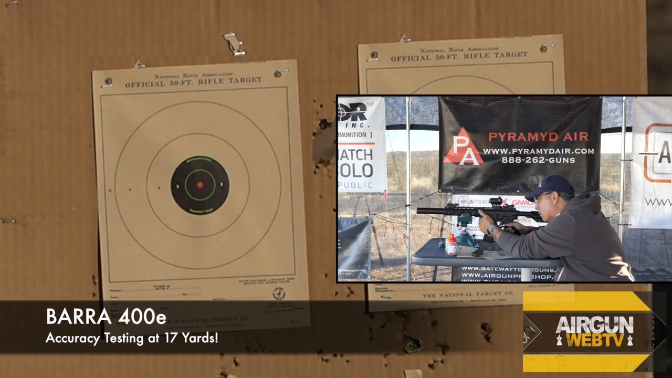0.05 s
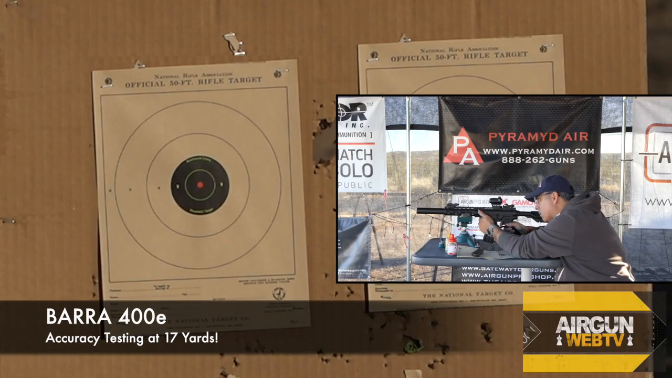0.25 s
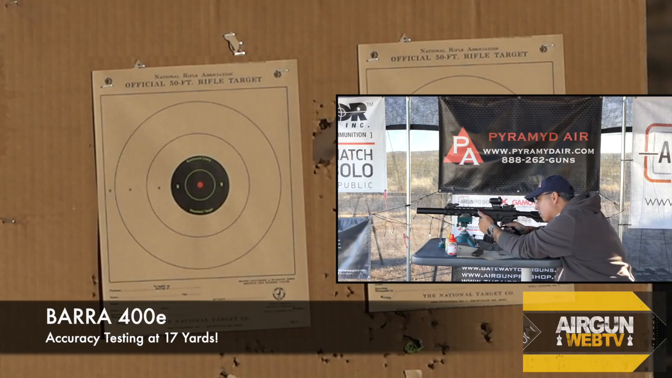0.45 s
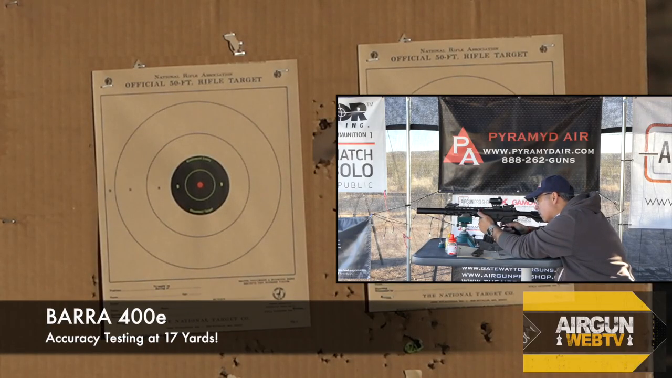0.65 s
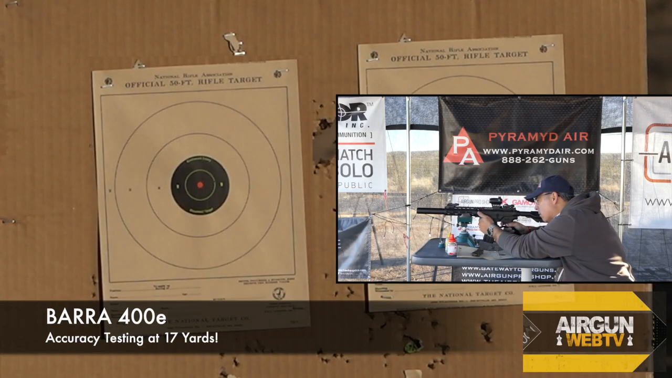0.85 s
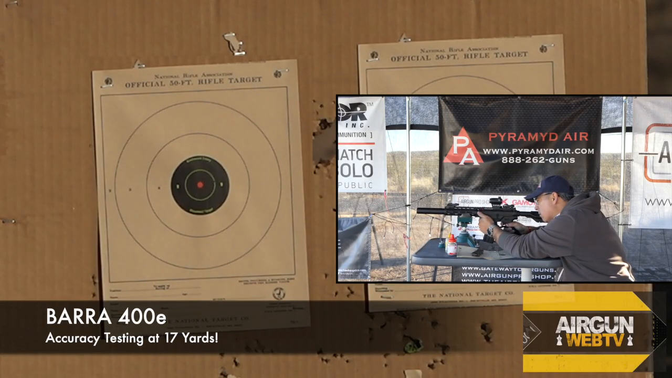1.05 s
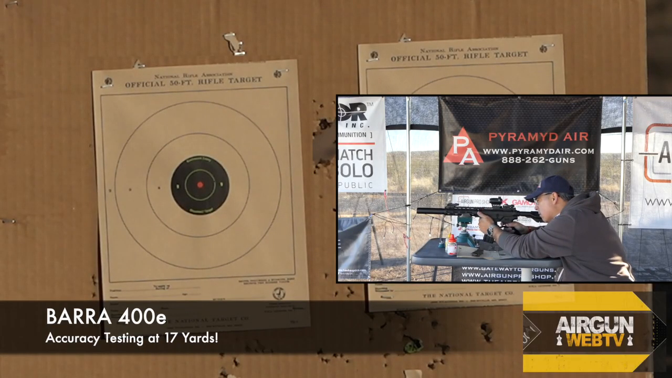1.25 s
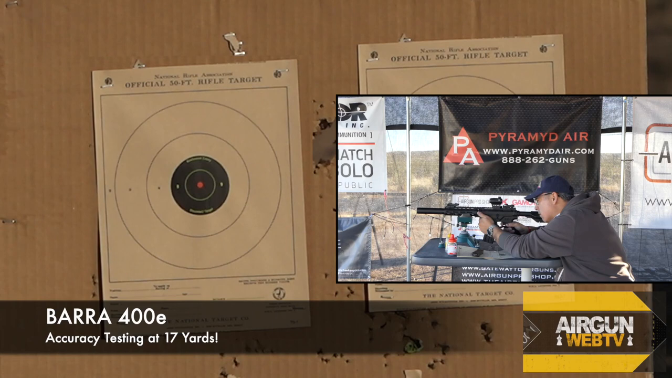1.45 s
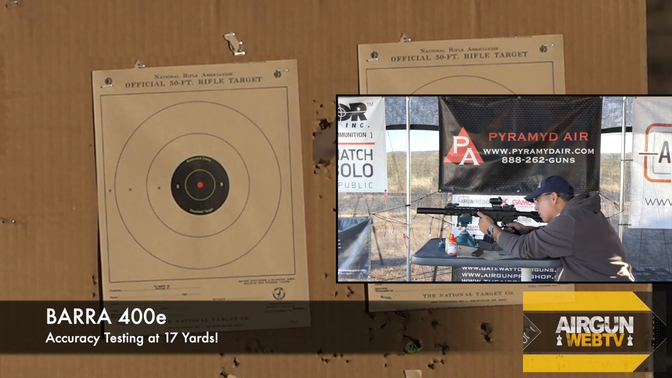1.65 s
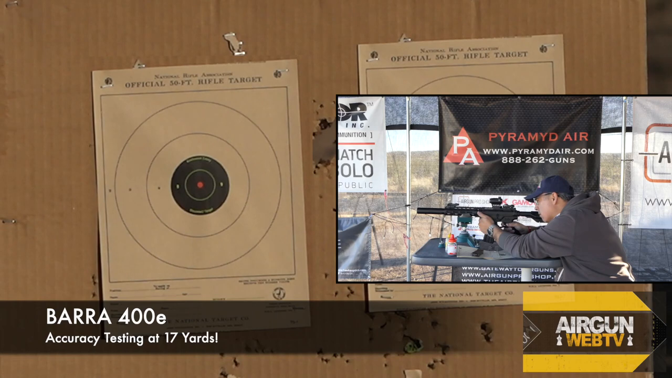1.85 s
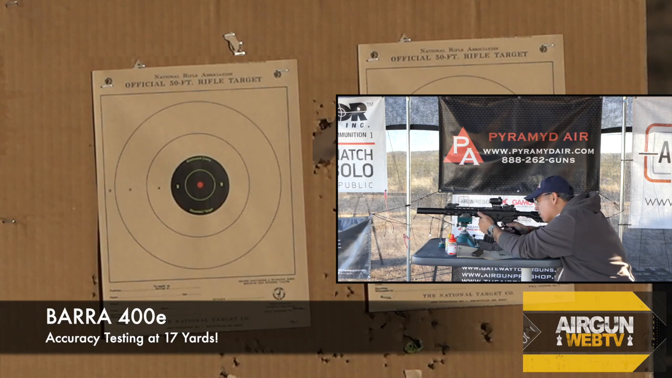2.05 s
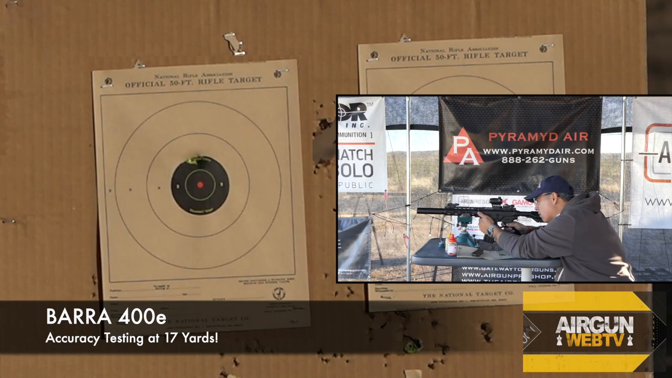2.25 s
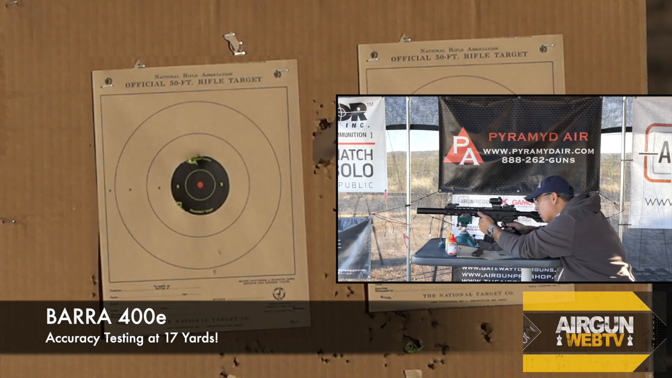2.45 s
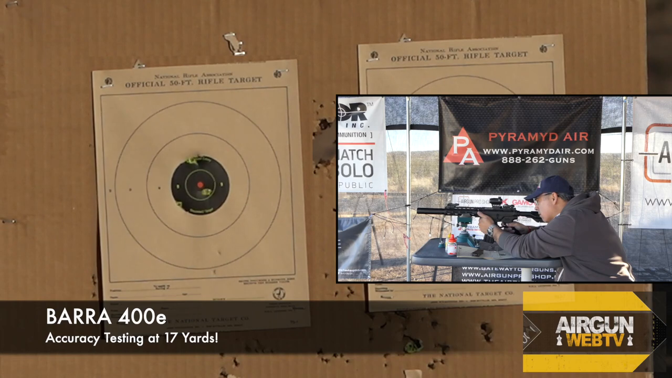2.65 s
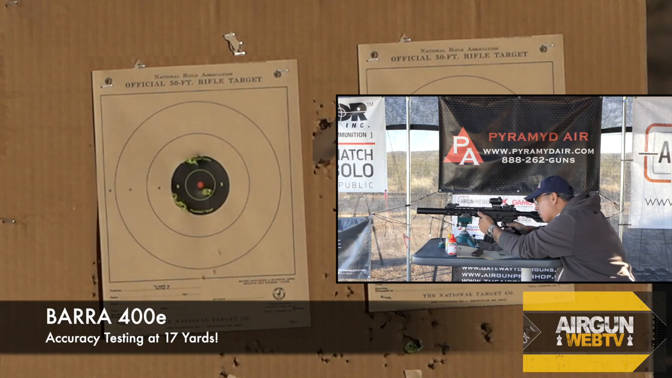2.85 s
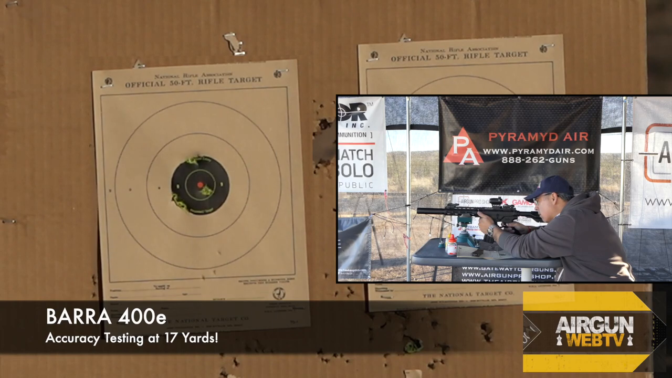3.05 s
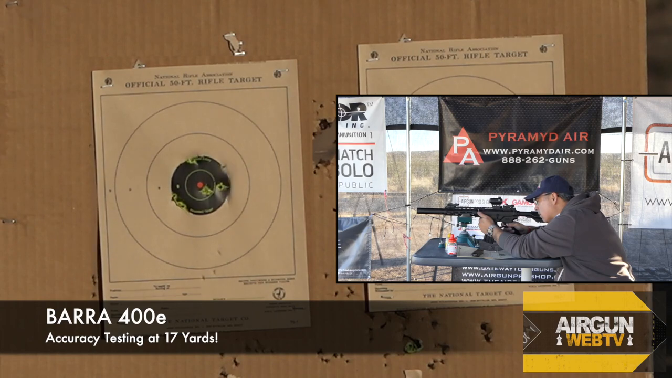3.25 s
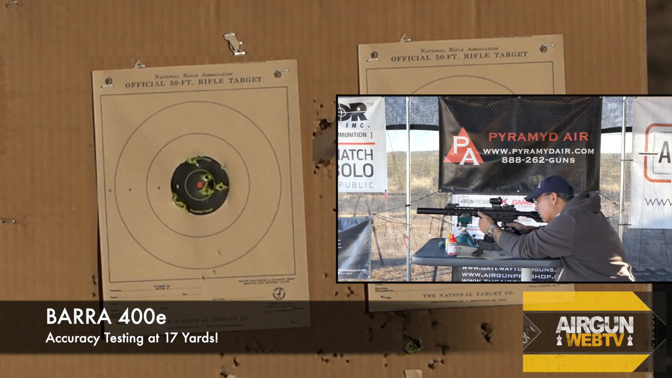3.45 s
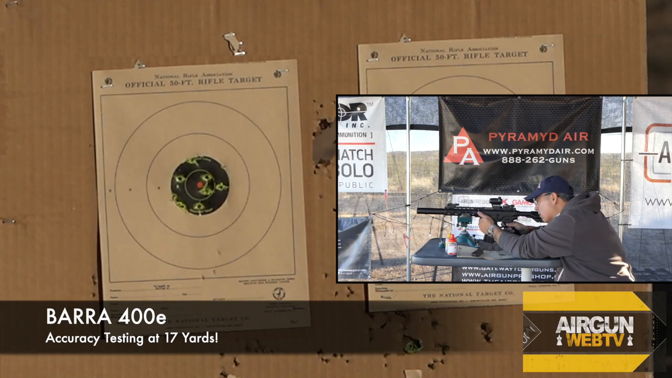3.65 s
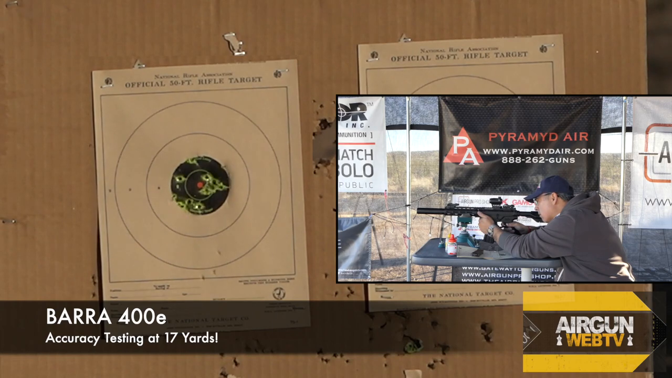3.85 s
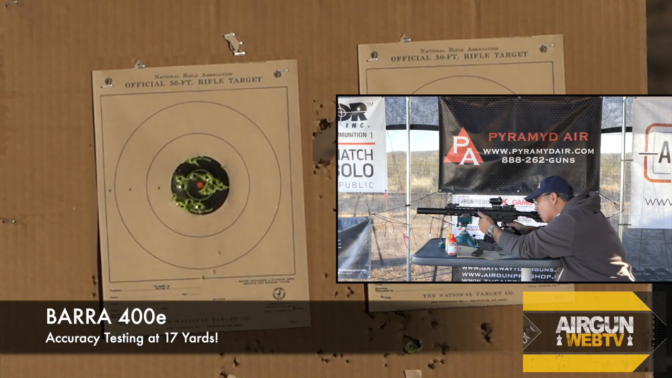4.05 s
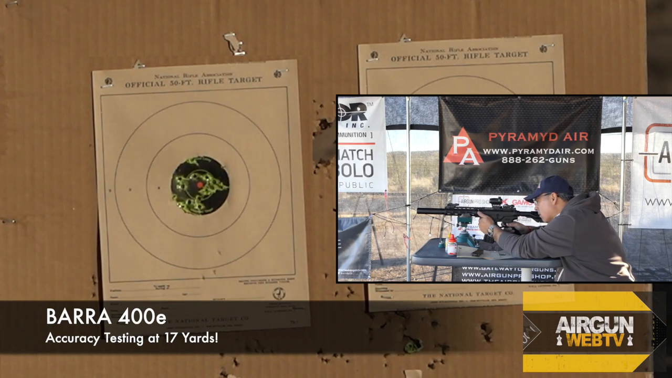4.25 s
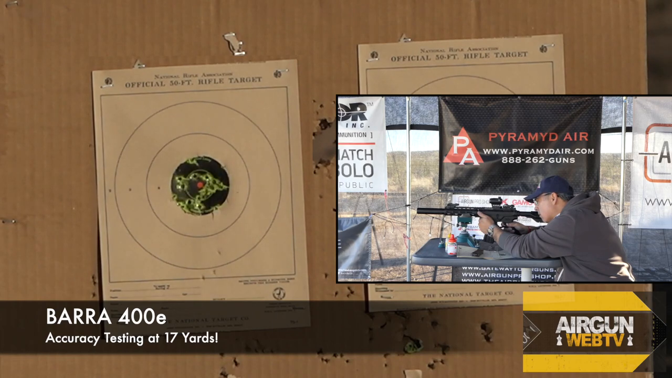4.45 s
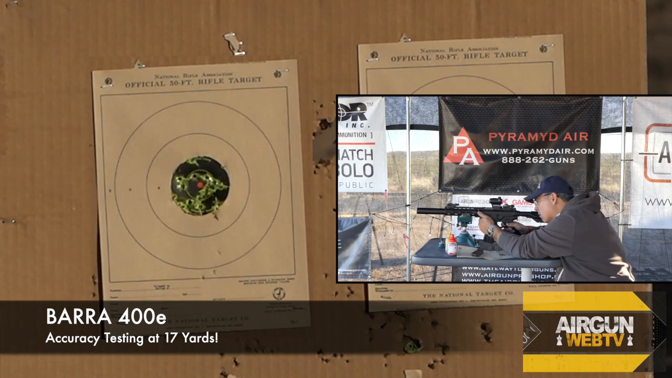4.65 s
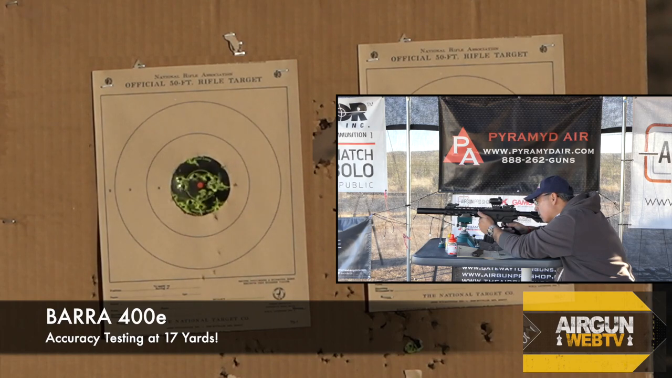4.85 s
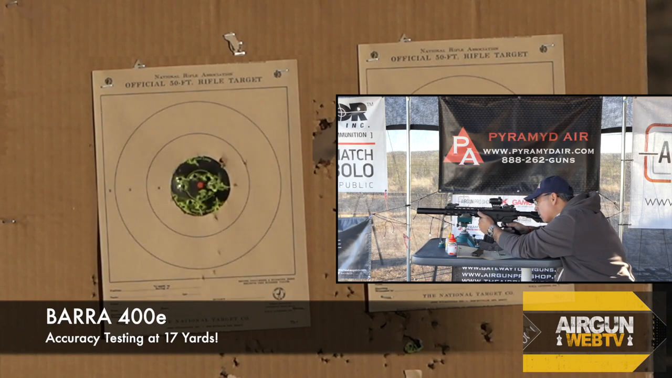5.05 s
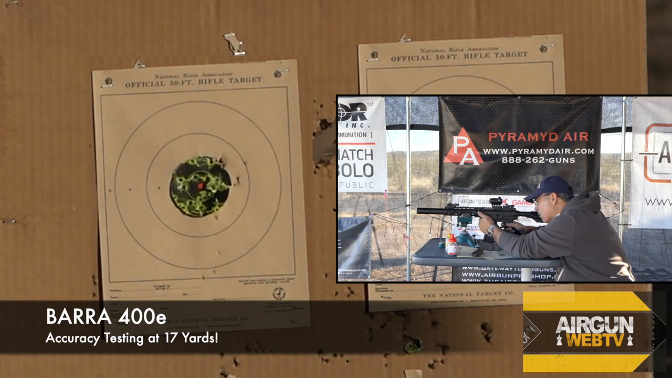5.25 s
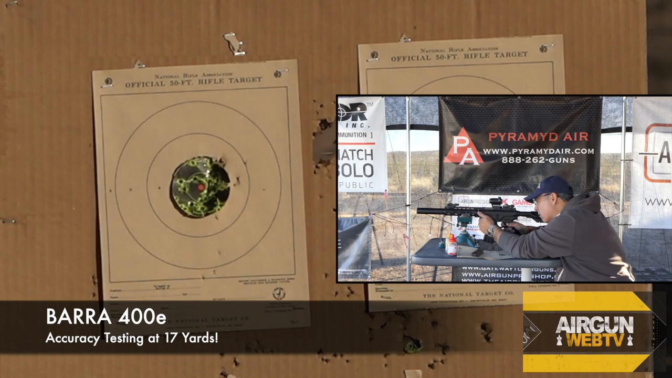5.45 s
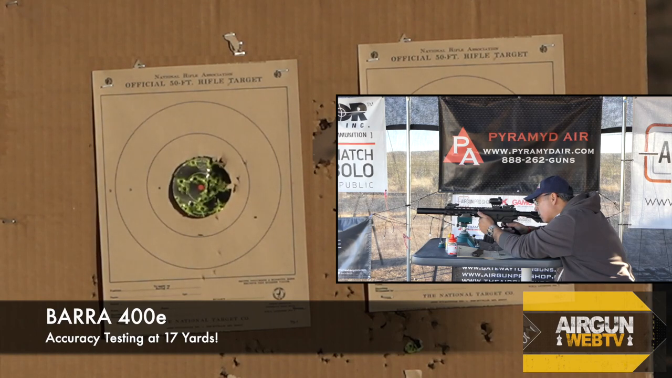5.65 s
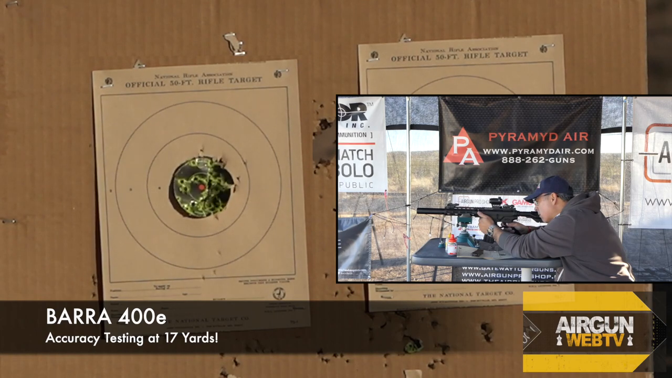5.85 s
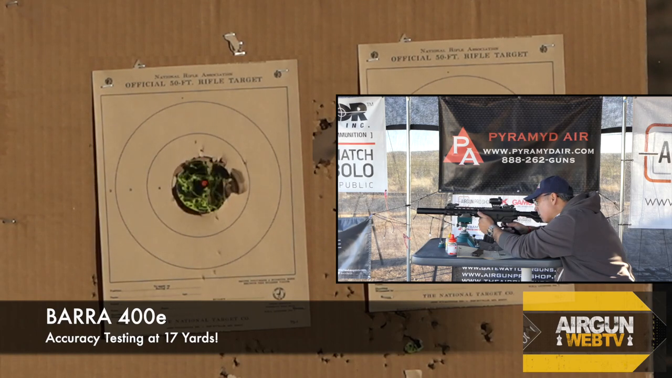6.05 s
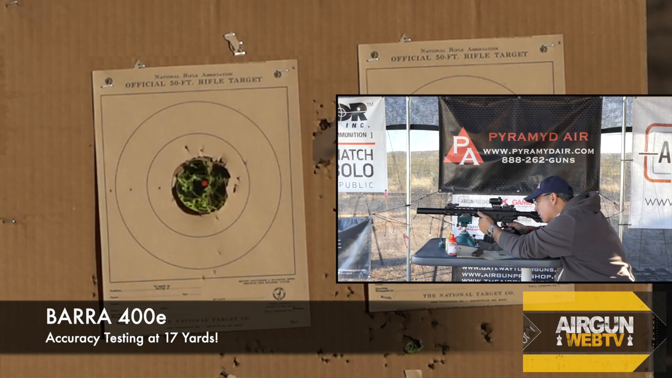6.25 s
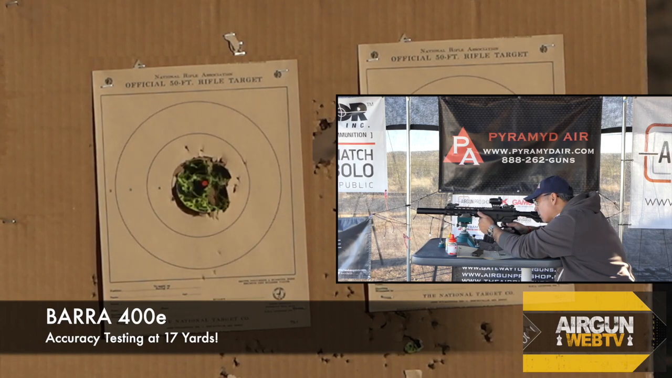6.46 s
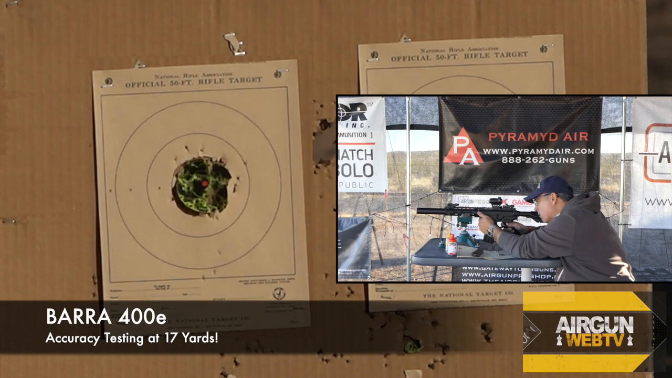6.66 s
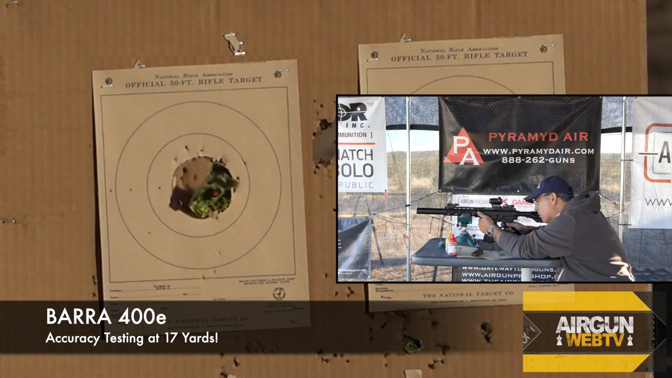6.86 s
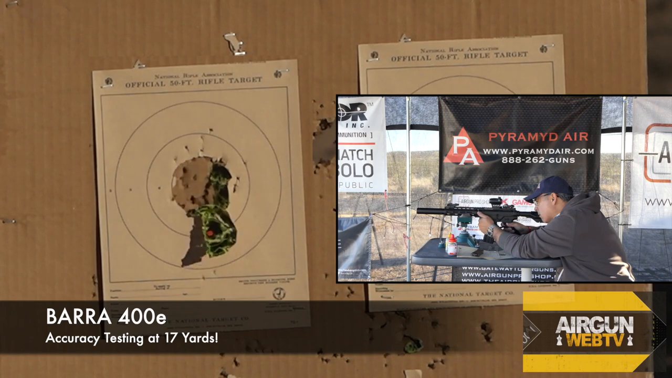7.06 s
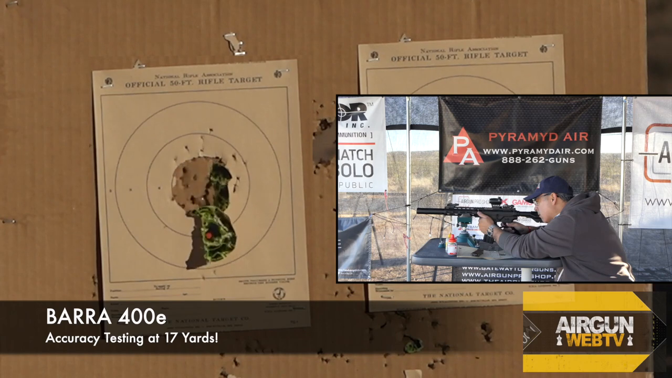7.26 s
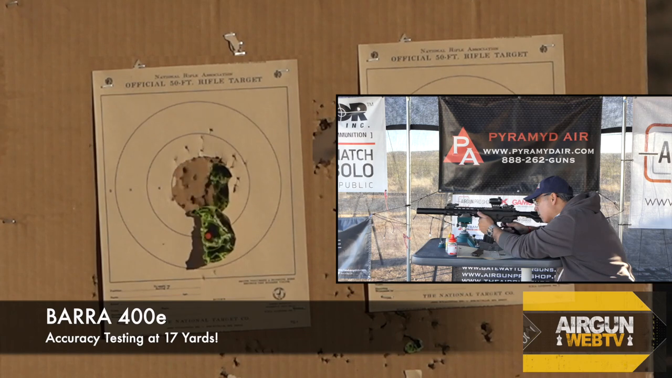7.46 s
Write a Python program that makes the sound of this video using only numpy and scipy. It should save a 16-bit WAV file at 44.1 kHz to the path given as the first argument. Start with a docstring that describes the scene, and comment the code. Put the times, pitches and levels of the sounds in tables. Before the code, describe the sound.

Quiet outdoor air with faint clicks, then a battery-powered BB rifle whirs up and fires a rapid even burst, ending in harder cracking strokes.

```python
"""Quiet outdoor air with a soft bump and faint clicks comes first, as a battery-powered BB rifle is readied.
Then its motor surges and it fires ten shots a second under a canopy. Tones locked to the gear teeth whine,
falling as the spring is wound and racing when the piston is let go; the loaded teeth scrape.
The piston thumps on its air cushion, then lands, exciting decaying modes of the gun's body;
once the BBs run out it slams home with a hard crack."""
import sys
import numpy as np
from scipy import signal
from scipy.fft import rfft, irfft, next_fast_len
from scipy.io import wavfile
from scipy.ndimage import map_coordinates

SR = 44100
rng = np.random.default_rng(int(sys.argv[2]) if len(sys.argv) > 2 else 0)


def unload_wav(signal):
    """Save mono or channel-first audio to the path in sys.argv[1] as 16-bit WAV at rate SR, clipped to [-1, 1]."""
    wavfile.write(
        sys.argv[1],
        SR,
        np.round(np.clip(np.atleast_2d(signal).T, -1, 1) * 32767).astype(np.int16),
    )


N = 331407

MOTOR_ON_S = 1.6725  # the trigger closes the circuit
LOADED_COUNT, EMPTY_COUNT = 54, 4  # strokes with a BB in the barrel, then strokes on an empty one


def amp(db):
    """Amplitude gain is ten to the power of level in decibels over twenty."""
    return 10 ** (np.asarray(db) / 20)


def unit(x):
    """Normalisation: dividing by the root mean square makes it 1."""
    return x / np.sqrt(np.mean(x ** 2) + 1e-20)


def along(points, hz):
    """Linear interpolation of (Hz, value) points on a logarithmic frequency axis."""
    f, v = np.transpose(points)
    return np.interp(np.log(hz + 1), np.log(f + 1), v)


def curves(rows):
    """Linear interpolation in time: one value per sample for each column after the time."""
    s, *cols = np.transpose(rows)
    return [np.interp(np.arange(N) / SR, s, c) for c in cols]


def wobble(rate):
    """Slow random modulation: a spline through random knots, rate of them a second."""
    return map_coordinates(rng.standard_normal(N // 8), [np.arange(N) * rate / SR], mode="wrap")


def filtered(x, gain):
    """Linear filtering: the spectrum of x is multiplied by a gain that depends on frequency."""
    padded = next_fast_len(N + 8192)
    spectrum = rfft(x, padded) * gain(np.fft.rfftfreq(padded, 1 / SR))
    return irfft(spectrum, padded)[:N]


def noise(spectrum):
    """Coloured noise: white noise shaped by a spectrum of (Hz, dB per Hz), then scaled to rms 1."""
    white = rng.standard_normal(N)
    return unit(filtered(white, lambda hz: amp(along(spectrum, hz))))


def fade(t, t60):
    """Exponential decay of a damped vibration, 60 dB down after t60 seconds."""
    return np.exp(-np.log(1000) * t / t60)


def add(track, s, sound):
    """Superposition: mix a sound into the track at time s."""
    part = track[max(round(s * SR), 0):][:len(sound)]
    part += sound[:len(part)]


def outdoor_air():
    """Ambient noise is broadband and steady in colour, while its level drifts at random."""
    # Outdoor background. Each row: frequency in Hz, relative level in dB per Hz.
    air_spectrum = [(20, 2), (50, 1.5), (87, -15.5), (160, -10.5), (270, -22), (370, -23), (520, -17),
                    (750, -14), (1150, -15.5), (1800, -19), (5700, -26), (15500, -28)]
    return amp(-66.5 + wobble(6.5)) * noise(air_spectrum)


def handling():
    """Brief contacts give noise bursts that decay: faint clicks and bumps as the gun is settled on its rest."""
    # Small clicks of the gun being readied. Each row: start in seconds, relative level in dB.
    click_rows = [(.536, -51), (.566, -54), (.738, -58), (1.663, -54)]
    # Soft handling bumps. Each row: start in seconds, relative level in dB.
    bump_rows = [(0.064, -54.5), (.875, -71)]
    t = np.arange(SR // 4) / SR
    clicks, bumps = np.zeros(N), np.zeros(N)
    for s, db in click_rows:
        add(clicks, s, amp(db - 3) * fade(t, 0.05))
    for s, db in bump_rows:
        soft_onset = 1 - np.exp(-t / 0.008)
        add(bumps, s, amp(db + 2) * fade(t, 0.44) * soft_onset)
    # spectra in (Hz, dB per Hz)
    tick = noise([(300, -4), (700, 1), (2200, 2), (4000, -11), (14000, -22)])
    thud = noise([(25, 2), (90, -7), (180, -4), (240, -16), (350, -20),
                  (900, -17), (3000, -26), (12000, -30)])
    return clicks * tick + bumps * thud


def canopy(x):
    """Reverberation as convolution with decaying noise: the short answer of canopy, banners and bench."""
    # Reverberation time. Each row: frequency in Hz, t60 in seconds.
    canopy_t60 = [(150, 0.17), (350, 0.056), (1000, 0.082), (4000, 0.043), (14000, 0.13)]
    hz, t, z = signal.stft(rng.standard_normal(SR // 3), SR, nperseg=256)
    decayed = z * fade(t, along(canopy_t60, hz)[:, None])
    tail = signal.istft(decayed, SR, nperseg=256)[1]
    # unit energy, arriving 5 ms after the direct sound
    response = np.pad(tail / np.linalg.norm(tail), (SR // 200, 0))
    return signal.fftconvolve(x, response)[:N]


def stroke_times():
    """Phase is the integral of rate: the piston is let go each time the sector gear completes a turn."""
    # The motor's pace, varying a little. Each row: time in seconds, rate in shots per second.
    fire_rate = [(1.75, 9.9765), (3.5, 9.9933), (4.1, 10.0227), (4.8, 9.9805), (5.7, 9.9849), (6.2, 9.9535),
                 (7, 9.9375), (7.1, 10.045), (7.5, 9.924)]
    first_shot_s = 1.7517
    rate, = curves(fire_rate)
    t = np.arange(N) / SR
    turns = np.cumsum(rate) / SR
    turns_since_first = turns - np.interp(first_shot_s, t, turns)
    return np.interp(np.arange(LOADED_COUNT + EMPTY_COUNT), turns_since_first, t)


def drive():
    """A starting transient: the motor's effort in dB surges against the resting gears and settles."""
    # How hard the running motor drives. Each row: time in seconds, level in dB.
    running_drive = [(1.8, -1), (2.4, 0.3), (4.2, 0), (4.7, -2), (5.8, -3.5), (6.1, -4), (6.7, -4),
                     (7.5, -5.5)]
    switch_on_s = 0.0043  # length of the attack
    surge_db, surge_peak_s = 7, 0.023  # size of the starting surge, and its time to crest
    running_db, = curves(running_drive)
    age = np.maximum(np.arange(N) / SR - MOTOR_ON_S, 0)
    attack = np.clip(age / switch_on_s, 1e-3, 1) ** 2
    surge = age / surge_peak_s * np.exp(1 - age / surge_peak_s)
    return running_db + surge_db * surge + 20 * np.log10(attack)


def tones(table, tooth_hz, rough):
    """Resonance: gear lines swell as they glide through the housing's peaks; uneven teeth roughen them."""
    # How the gearbox housing radiates. Each row: frequency in Hz, gain in dB.
    housing_gain = [(350, -24), (540, -8), (680, 0), (800, .5), (930, 3), (1050, -5), (1330, 1), (1600, -5),
                    (1900, -14), (2550, -1.5), (3000, -1.5), (3370, 1), (3650, 4), (3900, -6), (4300, 2.5),
                    (4800, -4), (5300, -3), (5700, 2.5), (6100, -5), (15500, -11)]
    turns = np.cumsum(tooth_hz) / SR
    out = np.zeros(N)
    for multiple, db in table:
        angle = 2 * np.pi * multiple * turns + rough * wobble(170)
        level = amp(db + along(housing_gain, multiple * tooth_hz))
        out += level * np.sqrt(2) * np.sin(angle)
    return out


def gearbox(times, drive_db):
    """Gear meshing under varying load: the motor slows while the spring loads the teeth, then races."""
    # The motor starting. Each row: time in seconds, mean tooth rate in Hz, relative spring load in dB.
    spin_up = [(1.674, 329.7, 9), (1.683, 441, 5), (1.697, 551.8, -2), (1.707, 628, 3), (1.72, 671, -0.5),
               (1.735, 660.3, -1.5), (1.744, 655.2, -5)]
    # One gearbox cycle. Each row: seconds after the shot, mean tooth rate in Hz, relative spring load in dB.
    cycle = [(0, 775, -9), (.01, 848, -17), (.018, 888, -20), (.025, 900, -18), (.032, 875, -3.5),
             (.045, 822, -4.5), (.06, 779, -3), (.075, 727, -.5), (.087, 686, -1), (.094, 695, -7)]
    # Gear tones that grow with the load. Each row: multiple of the tooth rate, relative level in dB.
    gear_lines = [(5 / 6, -36.5), (1, -30.2), (7 / 6, -37.5), (5 / 4, -42), (2, -33.3), (3, -37),
                  (4, -34.5), (19 / 4, -38), (5, -33.5), (6, -34.5), (7, -36), (8, -39), (10, -41),
                  (13, -36)]
    # Motor pinion, singing loaded or free. Each row: multiple of the tooth rate, relative level in dB.
    pinion_lines = [(15 / 4, -39), (15 / 2, -44), (45 / 4, -44)]
    # Scraping of loaded teeth. Each row: frequency in Hz, relative level in dB per Hz.
    grind_spectrum = [(350, -44), (540, -3), (820, -4.5), (1020, -17), (1280, -12), (1900, -16.5),
                      (2700, 2.5), (3600, 0), (3900, -6), (4330, 2.5), (5800, 3), (6700, -9.5), (7500, 1),
                      (15500, -73)]
    # Noise of the spinning motor. Each row: frequency in Hz, relative level in dB per Hz.
    whirr_spectrum = [(30, -4), (200, -14.5), (370, -15), (540, -5), (1220, 2), (1950, -11.5), (3300, -1),
                      (5200, -1.5), (8400, -4.5), (9400, 1.5), (11000, -7.5), (12800, -9), (13900, -6),
                      (15500, -20)]
    scrape_limit_db = -5  # the load beyond which the teeth scrape no harder

    cycles = [(s + delay, hz, db) for s in times for delay, hz, db in cycle]
    steady_hz, load_db = curves([*spin_up, *cycles])
    tooth_hz = steady_hz * (1 + .004 * wobble(25))
    # teeth scrape in a burst each time they meet
    meshing = unit(1 + .5 * np.cos(2 * np.pi * np.cumsum(tooth_hz) / SR))
    bite = meshing * amp(1.8 * wobble(400))
    scrape = amp(np.minimum(load_db, scrape_limit_db) - 26.0) * bite * noise(grind_spectrum)
    # the loaded gears whine; the motor and its pinion run on through the whole cycle
    whine = amp(load_db - .7) * tones(gear_lines, tooth_hz, rough=.2)
    song = amp(np.maximum(load_db, 0)) * tones(pinion_lines, tooth_hz, rough=.2)
    whirr = amp(-29.0 + 1.44 * wobble(900)) * noise(whirr_spectrum)
    return amp(drive_db) * (scrape + whine + song + whirr)


def blow(soft_hz, crack_db, crack_t60, scatter_db=1):
    """Modal excitation by impact: a soft contact leaves the body's high modes weak, a hard one cracks."""
    # Modes of the gun's body. Each row: frequency in Hz, mean relative level in dB, t60 in seconds.
    body_modes = [(591, -15.5, 0.03), (660, -21, 0.036), (821.4, 3, 0.014), (967, -0.5, 0.0076),
                  (1216, -12.5, 0.037), (1660, -39, .012), (2543, -13.5, 0.028), (3350, -33, .03),
                  (4180, -5, 0.01), (6430, -4, 0.007), (9100, -5, 0.0089)]
    t = np.arange(SR // 16) / SR
    hz, db, t60 = np.transpose(body_modes)[:, :, None]
    scattered_db = db + scatter_db * rng.standard_normal(hz.shape)
    size = amp(scattered_db) / np.sqrt(1 + (hz / soft_hz) ** 4)
    modes = np.sum(size * np.sin(2 * np.pi * hz * t) * fade(t, t60), axis=0)
    ring = modes * (1 - np.exp(-t / 0.00072))
    # the harder the contact, the brighter its crack
    band = [600, min(3 * soft_hz, SR / 4)]
    b, a = signal.butter(2, band, "band", fs=SR)
    crack = signal.lfilter(b, a, rng.standard_normal(len(t)))
    return ring + amp(crack_db) * crack * fade(t, crack_t60)


def pickup(times, drive_db):
    """Impact across backlash: the sector gear catches the piston rack with a double clack; slack knocks."""
    out = np.zeros(N)
    for s in times:
        for delay, db in [(.0285, -23.5), (.0302, -20)]:
            clack_s = s + delay + rng.normal(0, .0004)
            level = amp(db + rng.normal(0, 1))
            add(out, clack_s, level * blow(soft_hz=5000, crack_db=-1, crack_t60=0.022))
    knock = amp(-17.0) * blow(soft_hz=2490, crack_db=-18, crack_t60=0.039)
    add(out, MOTOR_ON_S + .009, knock)
    return out * amp(drive_db)


def shot_strengths(shots, drive_db):
    """Energy sharing, as rows (s, air cushion dB, landing dB): a good seal spares the landing."""
    # How hard the piston lands. Each row: time in seconds, mean relative level in dB.
    landing_level = [(1.75, -11.5), (2.3, -15.5), (3.3, -13.5), (5.4, -14), (5.95, -11.5), (6.35, -12),
                     (6.65, -14), (7.05, -14.5)]
    # Early shots whose air cushion holds so well that the piston barely lands. Each entry: shot, from 0.
    well_sealed = [1, 2, 5]
    sealed_cushion_db, sealed_landing_db = 4, -22  # how those shots differ
    base_cushion_db, cushion_per_drive = -14.5, 1  # relative level, and dB per dB of drive
    cushion_scatter_db, landing_scatter_db = 0.4, 0.04  # from shot to shot

    chance = rng.standard_normal((len(shots), 2))
    sealed = np.isin(np.arange(len(shots)), well_sealed)
    shot_drive_db = drive_db[(shots * SR).astype(int)]
    cushion_db = base_cushion_db + cushion_per_drive * shot_drive_db + cushion_scatter_db * chance[:, 0]
    landing_db = np.interp(shots, *np.transpose(landing_level)) + landing_scatter_db * chance[:, 1]
    cushion_db = cushion_db + sealed_cushion_db * sealed
    landing_db = landing_db + sealed_landing_db * sealed
    return np.transpose([shots, cushion_db, landing_db])


def piston(shots, slams, drive_db):
    """Trapped air softens impact: release, thump, landing; with no BB to hold it, a hard slam and rebound."""
    slam_db, slam_step_db = -13.5, -0.5  # first empty stroke (relative), and change with each further one
    out = np.zeros(N)
    for s, cushion_db, landing_db in shot_strengths(shots, drive_db):
        release = amp(cushion_db - 6.5) * blow(soft_hz=1190, crack_db=-19, crack_t60=0.008)
        thump = amp(cushion_db + 2) * blow(soft_hz=1750, crack_db=-5.5, crack_t60=0.01)
        landing = amp(landing_db + 2.5) * blow(soft_hz=1660, crack_db=-8.5, crack_t60=0.027)
        add(out, s - .0077, release)
        add(out, s - .0005, thump)
        add(out, s + 0.0074, landing)
    for k, s in enumerate(slams):
        db = slam_db + slam_step_db * k
        slam = amp(db + 4.5) * blow(soft_hz=9020, crack_db=-7, crack_t60=0.016)
        rebound = amp(db - 1.0) * blow(soft_hz=8970, crack_db=-4.0, crack_t60=0.017)
        add(out, s - .0006, slam)
        add(out, s + .0019, rebound)
    return out


def shove(shots, slams, drive_db, spring_hz=129, spring_db=-60, spring_t60=0.48):
    """Recoil: each stroke rocks the gun, less with no air to compress; the damped spring hums on."""
    # The low shove of a stroke. Each row: frequency in Hz, gain in dB.
    shove_spectrum = [(15, -25), (40, -2.5), (70, -18), (105, 2), (170, -2), (245, -0.5), (340, -5.5),
                      (500, -14), (1500, -60)]
    shove_per_drive = 1.1  # dB of shove per dB of drive
    strokes = np.zeros(N)
    for times, db in [(shots, 18.5), (slams, 14)]:
        for s in times:
            add(strokes, s, amp([db]))
            add(strokes, s + 0.0265, amp([db - 28]))  # the rack is caught again
    strokes *= amp(shove_per_drive * drive_db)
    # a quarter-cycle phase shift turns each impulse into a back-and-forth swing
    rocking = filtered(strokes, lambda hz: -1j * amp(along(shove_spectrum, hz)))
    t = np.arange(SR // 3) / SR
    hum = amp(spring_db) * np.sin(2 * np.pi * spring_hz * t) * fade(t, spring_t60)
    return rocking + signal.fftconvolve(strokes, hum)[:N]


def scene():
    """Superposition of direct and reflected sound: the gun close by, its surroundings, the quiet air."""
    times, drive_db = stroke_times(), drive()
    shots, slams = times[:LOADED_COUNT], times[LOADED_COUNT:]
    gun = handling() + gearbox(times, drive_db) + pickup(times, drive_db)
    gun += piston(shots, slams, drive_db) + shove(shots, slams, drive_db)
    return (gun + amp(-12.5) * canopy(gun) + outdoor_air())[None]


def record(dry):
    """Frequency response: the microphone colours the sound; the recorder keeps nothing above its limit."""
    # The microphone's colour, scooped in the low mids. Each row: frequency in Hz, gain in dB.
    mic_response = [(260, 0.5), (320, -7.5), (410, -5), (520, -1.5), (14000, -0.5), (15000, 0),
                    (15700, -16)]
    top_hz = 15700
    return filtered(dry[0], lambda hz: amp(along(mic_response, hz)) * (hz < top_hz))[None]


dry = scene()
out = record(dry)
unload_wav(out)
```